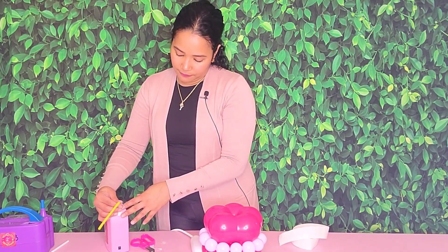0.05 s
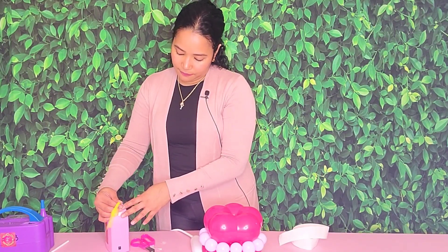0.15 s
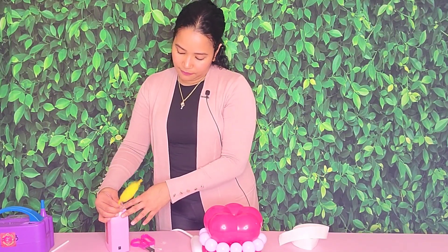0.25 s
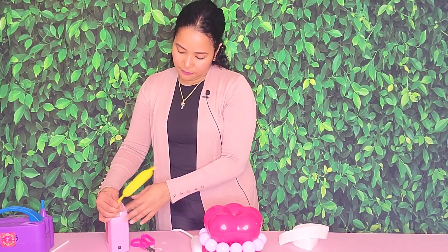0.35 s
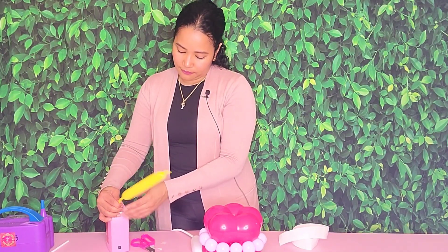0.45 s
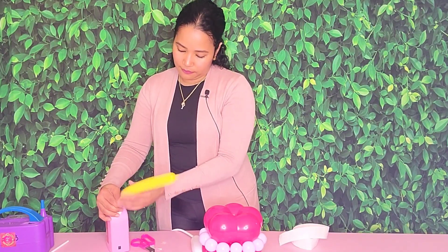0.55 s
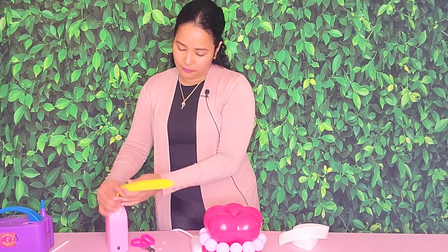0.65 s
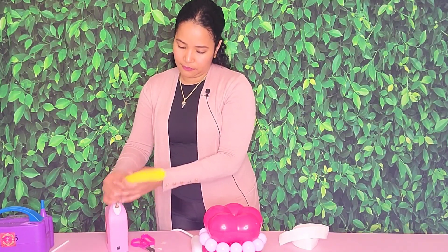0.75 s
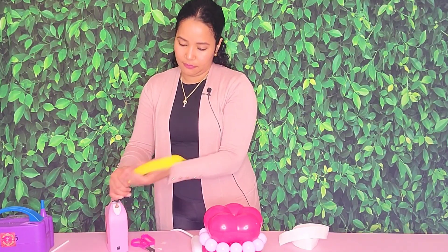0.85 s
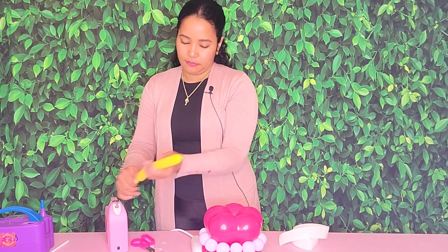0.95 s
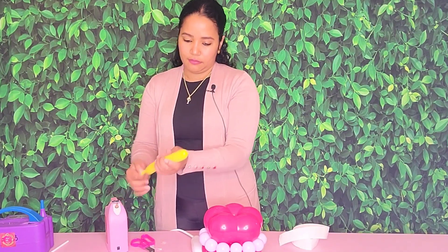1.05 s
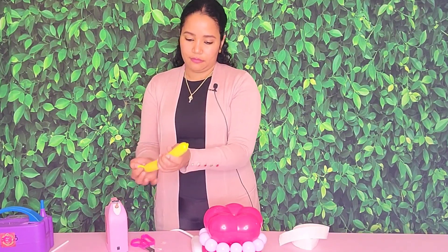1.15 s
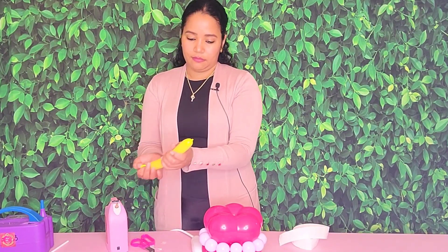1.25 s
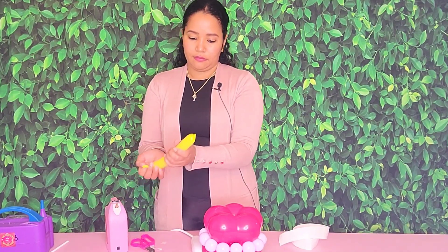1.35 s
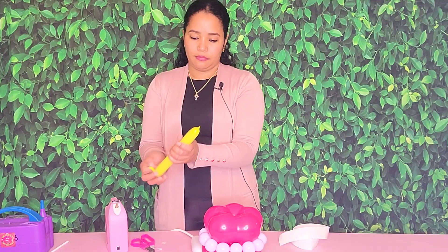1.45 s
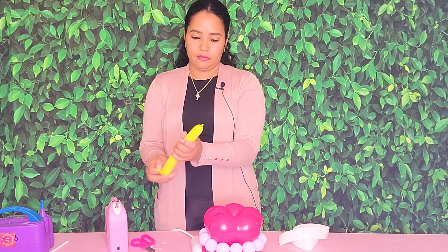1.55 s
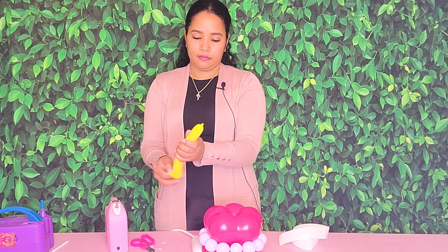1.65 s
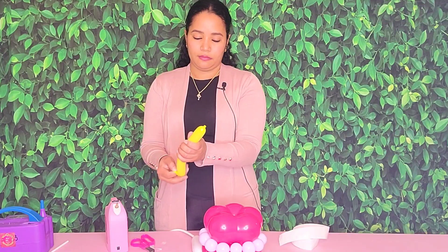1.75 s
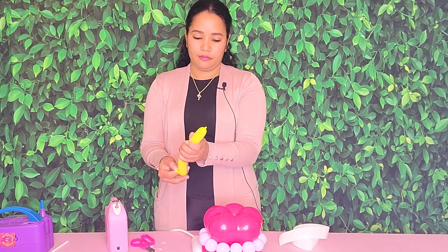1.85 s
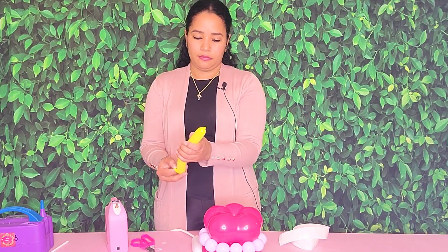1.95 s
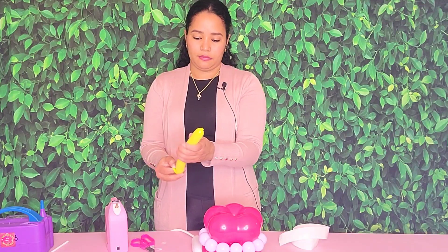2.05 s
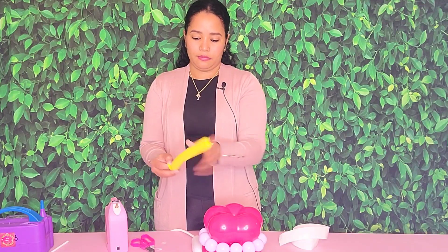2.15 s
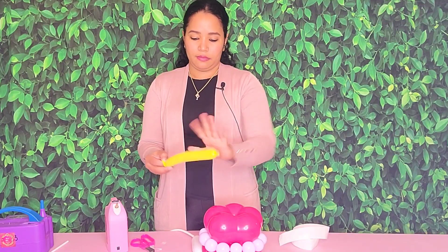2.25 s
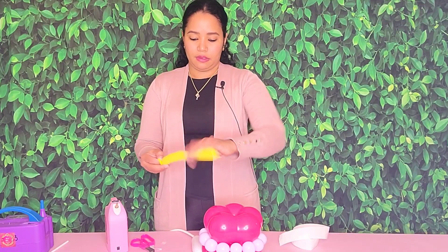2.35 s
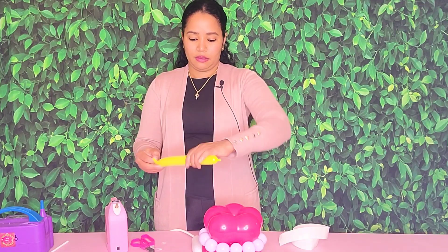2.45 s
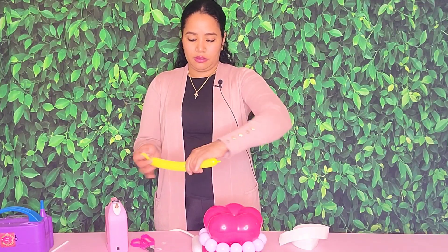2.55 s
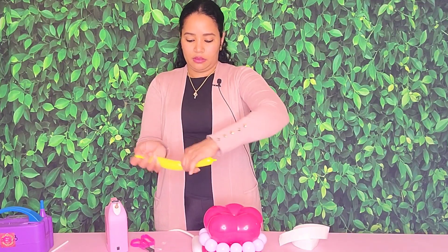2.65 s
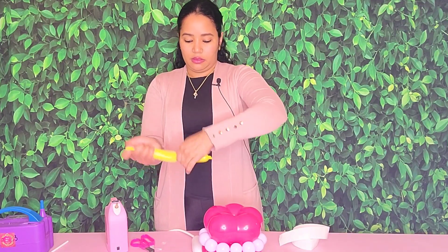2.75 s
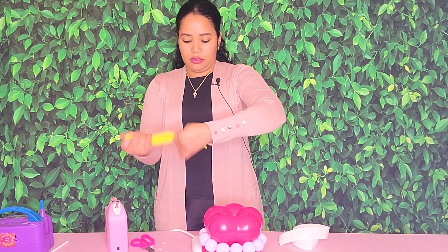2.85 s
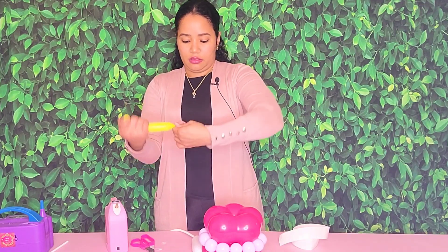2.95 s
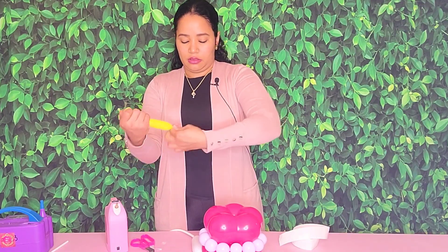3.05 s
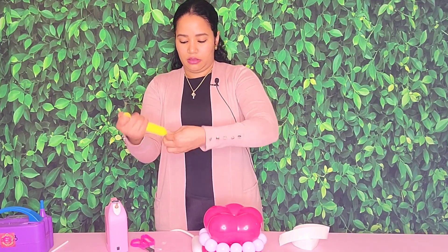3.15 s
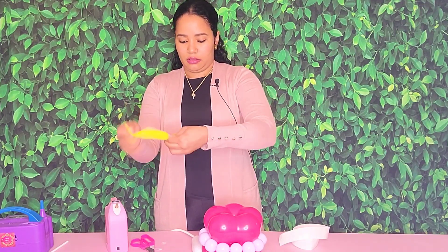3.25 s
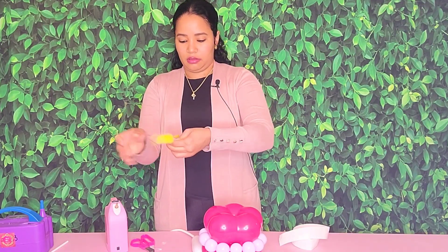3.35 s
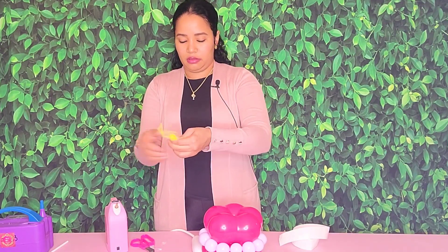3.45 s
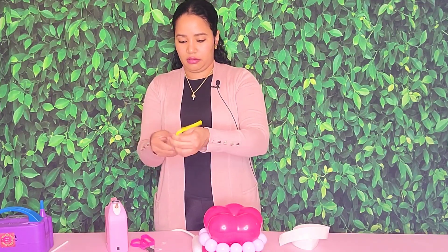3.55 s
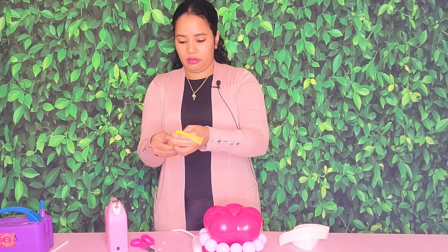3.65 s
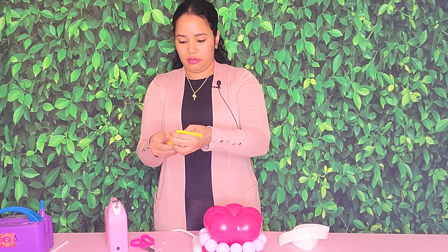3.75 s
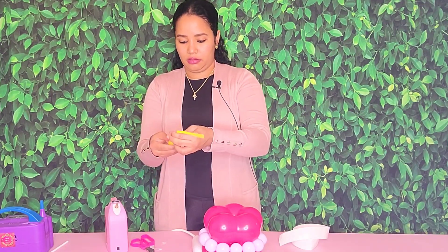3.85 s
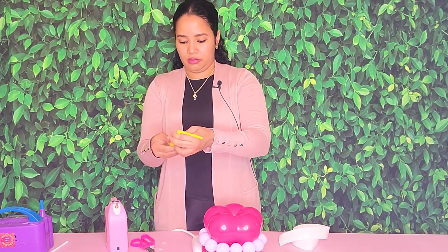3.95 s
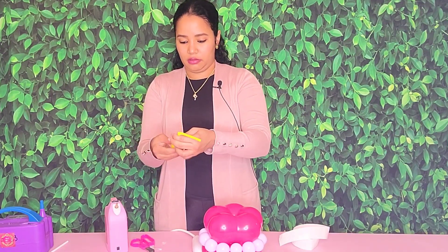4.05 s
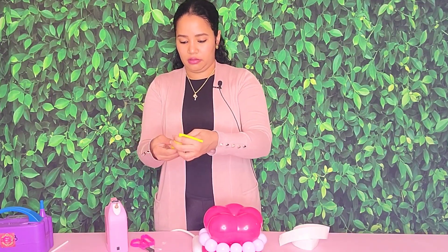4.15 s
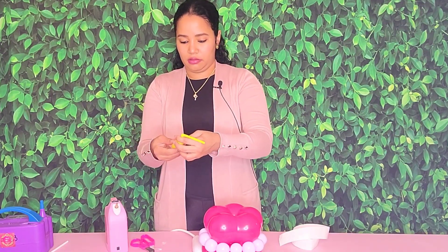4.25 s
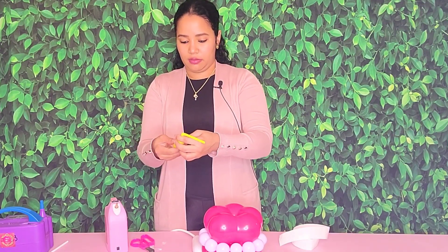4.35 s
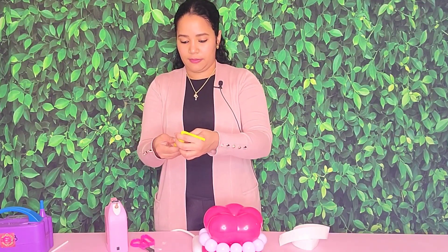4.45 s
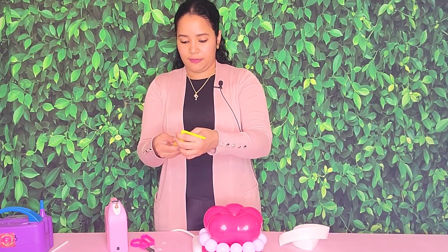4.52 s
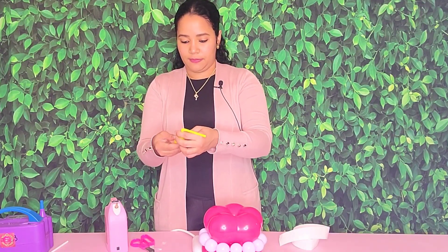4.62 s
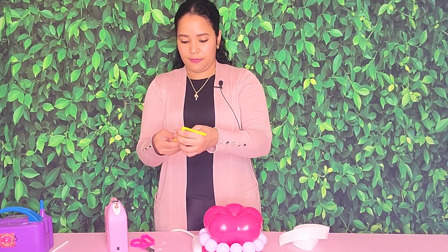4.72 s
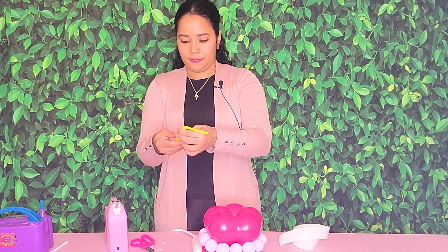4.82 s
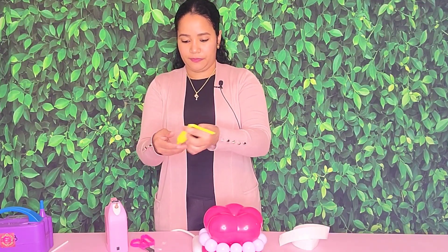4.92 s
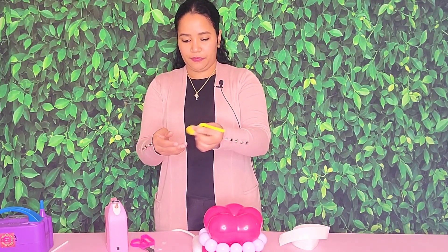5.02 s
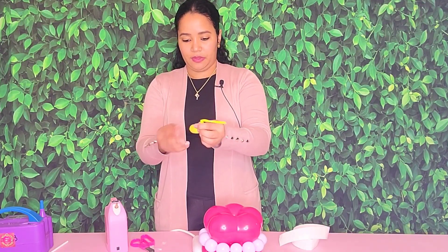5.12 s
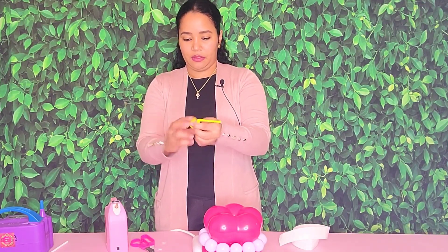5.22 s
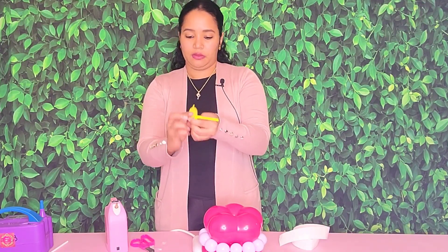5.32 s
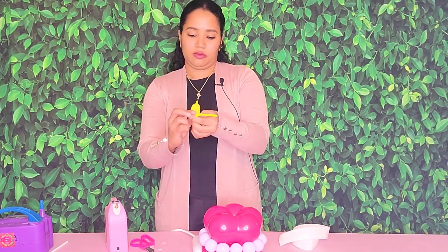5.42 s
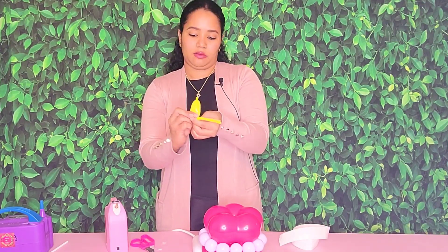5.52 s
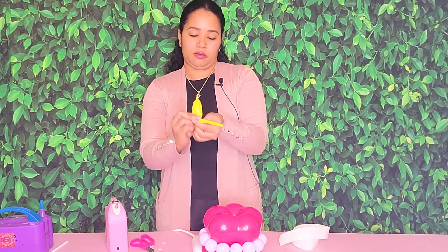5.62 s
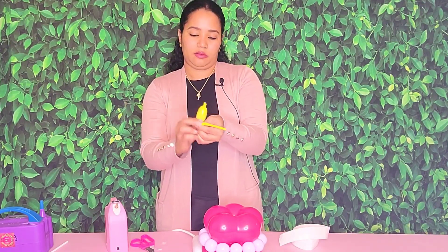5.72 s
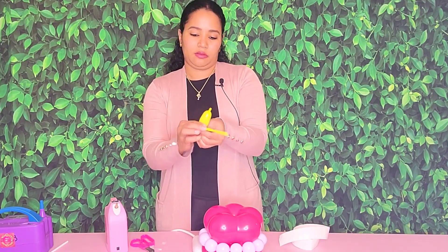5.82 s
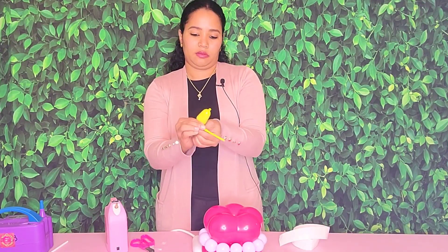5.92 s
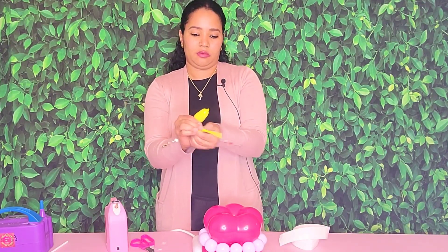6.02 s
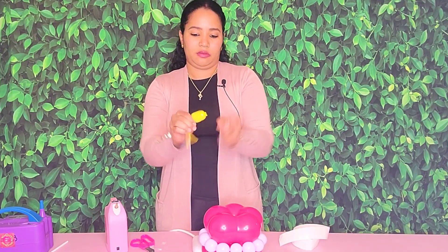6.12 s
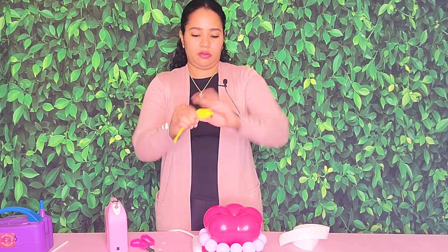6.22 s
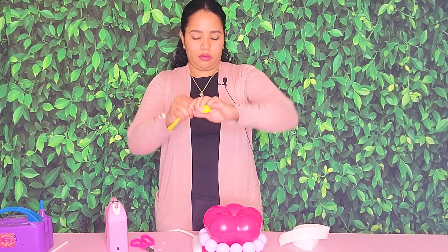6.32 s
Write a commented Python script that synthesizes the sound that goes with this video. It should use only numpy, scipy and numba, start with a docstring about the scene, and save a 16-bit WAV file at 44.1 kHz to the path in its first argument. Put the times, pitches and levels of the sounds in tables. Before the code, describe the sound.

In a small bare room with faint hum and hiss, a little electric pump clicks on and rattles with growing air hiss for half a second, then cuts off with a sharp puff. Hands rub the long balloon: swishing strokes, dense rubbery creaks and pops, two quick high squeaks just after three seconds, then sparser, drier ticks and small chirps. Close, clear microphone with a short room echo.

```python
"""A faint rub of latex over room air and mains hum; then a small electric piston pump fills a long balloon
for half a second: strokes thump its housing and the valve hisses louder as pressure builds.
Hands then stroke, squeeze and twist the balloon. Slips ring its air and wall as ticks and creaks, regular
slips make squeaks and chirps, skin hisses along it, a pinched leak whistles. Short decaying sines are the
pump's knocks and whistle and the bubble's thump and rings. The bare room adds a tail and a far wall's answer."""
import sys
import numpy as np
from scipy import signal
from scipy.fft import rfft, irfft, next_fast_len
from scipy.io import wavfile
from scipy.ndimage import map_coordinates
from numba import njit

SR = 44100
rng = np.random.default_rng(int(sys.argv[2]) if len(sys.argv) > 2 else 0)


def generate_wav(signal):
    """Clip the signal to [-1, 1] and save it as 16-bit WAV at the path in sys.argv[1]."""
    frames = np.transpose(np.atleast_2d(signal))
    scaled = np.clip(frames, -1, 1) * 32767
    pcm = np.round(scaled).astype(np.int16)
    wavfile.write(sys.argv[1], SR, pcm)


N = 281181
T = np.arange(N) / SR  # seconds

# Spectra set the colour of a layer; the layer's own gain sets how loud it is.
# Room air and preamp hiss: freq_hz, level_db (dB per Hz, relative)
ROOM_AIR = [(30, -38), (60, -10.5), (150, -13), (400, -30), (1000, 3.5), (2000, 4.5), (3500, -5.5),
            (6000, -7), (11000, -8), (16000, -24)]
# Mains hum: freq_hz, level_db (rms)
MAINS_HUM = [(120, -94), (240, -92)]
# The squeezed bubble's moving resonances: time_s, drum_hz, wall_hz
BUBBLE_MODES = [(.8, 1000, 3600), (1.3, 900, 3300), (1.7, 1250, 3800), (2.25, 750, 4200), (2.5, 1200, 3700),
                (2.68, 680, 3800), (2.95, 700, 4600), (3.09, 1000, 3300), (3.7, 1250, 3300),
                (4.1, 1080, 3400), (4.5, 1250, 3700), (6.38, 1150, 3600)]
# Finger grips, swelling and fading; a row with a negative time is practically silent:
# peak_s, rise_s (per 20 dB), fall_s (per 20 dB), creak_db, drum_db (re creak), bright_db (re creak)
FINGER_GRIPS = [(.007, -5.77, .05, -30.5, -22.5, -5), (.76, 1.3, 0.14, -39.5, -0.5, -23),
                (1, -0.74, .3, -43, -5, -18.5), (1.147, -0.2, 0.44, -43, -3.5, -18.5),
                (1.269, 0.01, -0.04, -21.5, -5.5, -17.5), (1.399, 0.2745, 0, -23.5, -4, -18.5),
                (1.59, 0.2, 0.09, -20, -7, -14), (1.69, 0.26, 1.8, -38.5, -16, -16.5),
                (1.92, -0.09, 0, -29, -7, -9.5), (2.011, 0.1227, 0.07, -24.5, -11.5, -16.5),
                (2.187, 0.73, -0.2, -26.5, -10, -18), (2.35, 0.07, .15, -23, -3.5, -18),
                (2.417, 0.12, 0.1, -26, -4, -17.5), (2.3, 0.1, .08, -26.5, -9, -18.5),
                (2.6, 0.14, 0.27, -24.5, -3.5, -19), (2.748, 0.1265, 0.35, -21, 0, -21),
                (2.867, 0.1748, 0.06, -19.5, -3.5, -18), (2.963, 0.6, 0.24, -20.5, -30, -19),
                (3.095, 0.05, 0.23, -17, -9.5, -20), (3.464, 0.2, 0.13, -30.5, -2.5, -22),
                (3.537, 0.09, -0.03, -19, -6, -12.5), (3.558, .012, .015, -19, -11, -12.5),
                (3.672, 0.07, 0.0629, -24, -3, -26.5), (3.75, -1, 0.5, -48, 2, -17),
                (3.933, -0.07, 0.14, -31.5, -4, -16), (4.103, 0.0619, 0.0767, -27, 5.5, -16.5),
                (4.37, 0.11, 0.07, -38.5, -9.5, -16), (4.558, 0.1, 0.17, -37.5, -6, -17.5),
                (4.8, 0.0048, 0.06, -29, -0.5, -21), (4.85, -0.55, 0.65, -47.5, -1, -14),
                (4.963, 0.05, 0.0635, -24, -2.5, -16.5), (5.32, 0.1216, 0.06, -32.5, -2, -4),
                (5.474, -1, -0.94, -30, -10.5, -11.5), (5.628, 0.06, 0.12, -31, -2, -13),
                (5.682, -2, -0.0123, -21.5, -17.5, -13), (5.855, .02, -0.63, -38.5, -11, -11),
                (6, 0.78, 0.15, -45, 3, -5.5), (6.306, .04, 6, -32.5, -6.5, -10),
                (6.362, -0.02, .06, -18.5, -14, -10)]
# Single slips, before each layer's trim: start_s, crack_db, drum_db (re crack), snap_db (re crack)
SINGLE_SLIPS = [(.1322, -13, -8.5, -14.5), (.608, -9, -18, 0), (.83, -25.5, -7.5, -20.5),
                (.8646, -32, -1.5, -10), (.993, -25, -8.5, -19), (1.0346, -30.5, -3.5, -6),
                (1.1193, -28.5, -1, -3), (1.2197, -22.5, -10, -8), (1.2819, -10, -17, -17.5),
                (1.4066, -5.5, -14, -19.5), (1.6516, -11, -14.5, -7.5), (1.7327, -11.5, -9.5, -13),
                (1.7811, -18, -10.5, -14), (1.9113, -7, -9.5, -25), (2.2473, -24, 7.5, -4),
                (2.3441, -2.5, -17.5, -17.5), (2.4022, -16, -20, -18), (2.6395, -9, -5.5, -6.5),
                (2.6807, -11.5, -29, -16), (2.8079, -3.5, -7, -15.5), (2.8458, -5, -17, -16.5),
                (2.874, -6.5, -26, -19), (2.931, -2, -28, -15), (3.0427, -13, -12, -11.5),
                (3.0811, -6.5, -29, -18), (3.1315, -4.5, -14, -14.5), (3.2078, -11.5, -12, 6),
                (3.3185, -10.5, -14.5, 11), (3.421, -9, -18, 3), (3.7754, -23, -23, -14),
                (3.7853, -30.5, 1, -17), (3.8044, -24, -17.5, -19), (3.8396, -35.5, -12, -13),
                (4.0071, -22, -3, -9), (4.1443, -17, -12, -22), (4.1754, -17, -12, -22.5),
                (4.2349, -27.5, -7, -19.5), (4.3859, -19, -17, -18.5), (4.399, -21, -25, -15.5),
                (4.421, -27, 5, -6.5), (4.5148, -29.5, -14.5, -11.5), (4.5466, -21.5, -13.5, -17),
                (4.5587, -30, 5.5, -11), (4.7026, -27, -17.5, -17.5), (4.807, -24, -10, -26),
                (4.8532, -29.5, -9, -25), (5.0476, -48.5, 12.5, -9), (5.4594, -39, -17, -0.5),
                (5.4695, -12.5, -15.5, -12.5), (5.5181, -25.5, -25, -12.5), (5.618, -26.5, -11, -10.5),
                (5.8491, -21.5, -19, -6), (6.0243, -20, -7, -9), (6.0536, -30.5, 0, -10),
                (6.163, -38, -14, -18), (6.2219, -25, -7, -11.5)]
# Runs of slips at a steady pace, before each layer's trim:
# start_s, length_s, gap_s, crack_db, change_db (over the run), drum_db (re crack)
SLIP_RUNS = [(1.6828, 0.0066, 0.0056, -11.5, -1, -12), (1.9227, 0.0043, 0.0046, -14.5, -2, -7.5),
             (2.0108, 0.0153, 0.014, -11, -1.5, -16.5), (2.1233, 0.082, .018, -12.5, -8, -11),
             (2.2872, .021, 0.00725, -16.5, 1, -17), (2.3568, 0.0174, 0.0067, -8.5, -1, -14),
             (2.5691, .024, .012, -11, -0.5, -25), (2.8365, 0.085, .0097, -8, 2.5, -14),
             (2.9543, 0.02, 0.0054, -4, -2, -24.5), (3.0671, 0.037, .0106, -10.5, -1.5, -19.5),
             (3.531, .012, 0.0037, -18, -0.5, -9.5), (3.5578, .004, .0035, -14.5, 1.5, -9),
             (3.733, 0.029, .014, -31, -1, -1.5), (3.9186, 0.03, 0.01014, -23, 5.5, -15),
             (4.0514, 0.0047, 0.0046, -22.5, -2, -6), (4.0744, 0.036, .0126, -21, 4, 0),
             (4.2942, 0.066, .011, -32.5, 6, -11), (4.4366, 0.058, 0.0226, -29, -4, -20),
             (4.5877, 0.0414, .0102, -21, -5.5, -15.5), (4.7605, 0.017, 0.0061, -32, 4, -7),
             (4.9187, .027, .0067, -32.5, 6, -10.5), (4.952, 0.027, 0.0054, -11.5, -16, -11.5),
             (5.536, .027, .0066, -35.5, 0, -17), (5.6234, 0.029, .0064, -15, -3, -10.5),
             (5.7612, .029, 0.013, -21.5, -6, -24), (5.9124, 0.11, 0.01457, -31.5, -2, -1),
             (6.304, 0.008, 0.00505, -19.5, 2, -14.5), (6.3453, 0.0303, 0.0047, -16.5, -1, -24.5)]
# The housing's answer to a stroke: multiple (of the stroke rate), level_db (relative)
HOUSING = [(1, -23), (2, -21), (3, -4), (4, -1), (5, -6), (6, -4), (7, -8), (8, -7), (9, -15), (10, -7),
           (11, -1), (12, -1), (13, -7), (14, -3), (15, -1), (16, -4), (17, -6), (18, 0), (19, -5),
           (20, -6), (21, -8), (22, -6), (23, -3), (24, -11), (25, -14), (26, -14), (27, -18), (28, -16),
           (29, -20)]
# Air through the valve: freq_hz, level_db (dB per Hz, relative)
VALVE_AIR = [(1290, -23), (2200, 10.5), (2430, 9), (2690, 5.5), (3870, 9), (5720, 4), (8240, 6),
             (9970, 2.5), (11200, 7), (16000, -14.5)]
# Air escaping at the nozzle: peak_s, level_db, t60_s
NOZZLE_BLASTS = [(0.121, -27, 0.042), (0.607, -20, 0.051), (0.627, -21.5, .1)]
# Short ringing tones, the pump's knocks and whistle, the bubble's thump and rings:
# start_s, level_db (peak), pitch_hz, t60_s (of the first fifth; the tone dies faster after that)
SHORT_TONES = [(.081, -24, 950, .12), (.1325, -3, 1150, .02), (.6, -22, 8200, .2), (1.31, -26, 3100, .9),
               (2.246, -25, 330, .06), (2.256, -36, 1750, .2), (2.443, -22, 1400, .28),
               (5.849, -33, 2550, .1)]
# A palm's long strokes along the latex: time_s, level_db (before its ripple)
PALM_STROKES = [(.76, -57), (1, -56.5), (1.12, -34.5), (1.22, -51), (1.4, -41.5), (1.46, -48),
                (1.53, -28.5), (1.67, -23), (1.79, -39.5), (1.97, -28.5), (2.15, -26), (2.42, -32.5),
                (2.52, -27.5), (2.59, -37.5), (3.09, -33.5), (3.43, -33), (3.52, -51), (3.87, -72),
                (4.01, -44.5), (4.74, -78)]
# Skin hiss: freq_hz, level_db (dB per Hz, relative)
SKIN_HISS = [(40, -55), (200, -23.5), (3530, -11), (6000, -14.5), (7520, -7), (8820, -3), (9860, -6.5),
             (10500, -2.5), (11600, 0), (12400, -2), (13500, -7), (15200, -8.5), (16000, -14)]
# Regular stick-slip, before the catch and the flutter:
# start_s, length_s, first_rate_hz, last_rate_hz (slips), level_db, roughness (0-1)
SQUEAK_NOTES = [(3.209, .058, 876, 835, -10.5, .12), (3.317, .048, 822, 788, -11, .17)]
# Squeak harmonics: multiple (of the slip rate), level_db (relative)
SQUEAK_HARMONICS = [(1, -21), (2, 0), (3, -15), (4, -16), (5, -18), (6, -7), (7, -10), (8, -5), (9, -10),
                    (10, -11), (11, -1), (12, -7), (13, -4), (14, -12), (15, -18), (16, -22), (17, -24),
                    (18, -25)]
# Duller creaks, before the catch and the flutter:
# start_s, length_s, first_rate_hz, last_rate_hz (slips), level_db, roughness (0-1)
CHIRP_NOTES = [(5.234, 0.012, 822, 822, -22, .15), (5.246, .028, 801.5, 731.1, -14.5, .25),
               (5.276, 0.054, 417, 382.5, -20, .9), (5.669, 0.023, 573, 588, -20.5, 0.99)]
# Chirp harmonics: multiple (of the slip rate), level_db (relative)
CHIRP_HARMONICS = [(1, -2.5), (2, -4), (3, -1.5), (4, 0), (5, -1.5), (6, -4), (7, -17), (8, -20)]
# A pinched air leak, before a 9 dB lift: time_s, pitch_hz, level_db (peak)
LEAK = [(5.08, 10321, -62), (5.116, 12500, -58), (5.2, 13800, -71)]
# The room's diffuse decay: freq_hz, t60_s
ROOM_DECAY = [(200, 0.21), (2000, 0.25), (6000, 0.061), (14000, 0.028)]

RUN_SNAP_DB, RUN_SCATTER_DB, RUN_JITTER = -18.5, 2.5, .08  # re crack; from slip to slip; share of the gap
TWISTED_S, BELLY_LONG, BELLY_SHORT = 3.5, 0.42, 0.0308  # once twisted off, the low mode's gain drops
BASS_LONG_HZ, BASS_SHORT_HZ = 250, 453  # and the bubble radiates less bass
ON_S, OFF_S = 0.07866, 0.59  # the pump's button goes down, comes up
RUN_HZ, START_LAG_HZ, SPIN_UP_S, RUN_DOWN_HZ_PER_S = 75.72, 21, .04, 130  # strokes per second
THROB_DB, THROB_RISE_S, THROB_T60 = -20, 0.023, .38  # 27 dB up in the rise
AIR_DB, AIR_GROWS_DB_PER_S, AIR_OPENS_S, AIR_T60 = -21.5, 11.5, .113, 0.48  # level as the button comes up
SETTLE_S, COAST_EVEN = 0.045, 0.404  # time scale of strokes turning even; evenness 0-1 while coasting
CATCH_HZ, CATCH_ROUGH, CATCH_S = 15, 0.22, .007  # a squeak starts higher and rougher, then settles
TOP_HZ = 15900  # band limit


def amp(db):
    """Decibels to linear gain."""
    return 10 ** (np.asarray(db) / 20)


def unit(x):
    """Scale to rms 1."""
    return x / np.sqrt(np.mean(x ** 2) + 1e-20)


def along(points, hz):
    """Interpolate (freq_hz, value) points on a log frequency axis."""
    f, v = np.transpose(points)
    return np.interp(np.log(hz + 1), np.log(f + 1), v)


def curves(rows):
    """One value per sample for each column, and a gate that is open while the table lasts."""
    s, *cols = np.transpose(rows)
    gate = np.clip(np.minimum(T - s[0], s[-1] - T) / 0.001864, 0, 1)
    return [np.interp(T, s, c) for c in cols] + [gate]


def wobble(rate):
    """A smooth random curve with rate knots a second."""
    knots = rng.standard_normal(int(N * rate / SR) + 4)
    return map_coordinates(knots, [T * rate])


def filtered(x, response):
    """Multiply the spectrum by a complex response of frequency."""
    m = next_fast_len(N + SR // 2)
    hz = np.fft.rfftfreq(m, 1 / SR)
    return irfft(rfft(x, m) * response(hz), m)[:N]


def noise(spectrum):
    """Coloured noise of rms 1."""
    return unit(filtered(rng.standard_normal(N), lambda hz: amp(along(spectrum, hz))))


@njit
def resonate(x, cosine, pole):
    """Two-pole band-pass whose centre moves."""
    y = np.zeros(len(x))
    for i in range(2, len(x)):
        y[i] = x[i] - x[i - 2] + 2 * pole * cosine[i] * y[i - 1] - pole * pole * y[i - 2]
    return y


def ring(x, hz, width_hz):
    """Moving resonance, scaled so that white noise keeps its rms."""
    pole = np.exp(-np.pi * width_hz / SR)
    cosine = np.cos(2 * np.pi * hz / SR + 0 * x)
    return resonate(x, cosine, pole) * np.sqrt((1 - pole ** 2) / 2)


def bursts(sizes, t60):
    """Every impulse becomes a puff of noise that dies in t60 seconds."""
    puff = amp(-60 * T[:SR // 20] / t60)
    return signal.fftconvolve(np.abs(sizes), puff)[:N] * rng.standard_normal(N)


def stack(turns, orders, flutter_db, lag=0):
    """Harmonics phased as a sudden push that rings out; high ones lag, each flutters alone. Nominal rms 1."""
    k, db = np.transpose(orders)
    envelope_db = np.interp(np.arange(129), np.r_[0, k, 2 * k[-1]], np.r_[db[0] - 20, db, -60])
    log = np.log(amp(envelope_db))
    phase = -signal.hilbert(np.r_[log, log[-2:0:-1]]).imag  # minimum phase
    lines = 0
    for n, level in orders:
        gain = amp(level + flutter_db * wobble(30.22))
        lines = lines + gain * np.cos(2 * np.pi * n * (turns - lag * n) + phase[int(n)])
    return lines / np.sqrt(np.sum(amp(2 * db)) / 2)


def room_air():
    """Steady coloured noise of room air and preamp."""
    return amp(-60.5) * noise(ROOM_AIR)


def mains_hum():
    """Steady sines at multiples of the mains frequency."""
    return sum(amp(db) * np.sqrt(2) * np.sin(2 * np.pi * hz * T) for hz, db in MAINS_HUM)


def swells(rows):
    """Gains that rise and fall at a steady dB rate, power-summed for each level column, each re the first."""
    power = np.zeros((len(rows[0]) - 3, N))
    for s, rise, fall, db, *rel_db in rows:
        span = slice(max(int((s - 3 * rise) * SR), 0), int((s + 3 * fall) * SR))
        t = T[span] - s
        drop_db = 20 * np.maximum(-t / rise, t / fall)
        power[:, span] += amp(2 * (db + np.r_[0, rel_db][:, None] - drop_db))
    return np.sqrt(power)


def slips():
    """Sudden releases of the latex: the single slips, then the runs laid out at their pace."""
    rows = list(SINGLE_SLIPS)
    for s, length, gap, db, change_db, drum_db in SLIP_RUNS:
        chance = rng.standard_normal((16, 2))  # a run has at most 16 slips
        for k in range(min(round(length / gap) + 1, 16)):
            at = gap * (k + RUN_JITTER * chance[k, 0] * (k > 0))
            crack_db = db + change_db * at / length + RUN_SCATTER_DB * chance[k, 1]
            rows.append((s + at, crack_db, drum_db, RUN_SNAP_DB))
    return np.transpose(rows)


def latex():
    """Slips, single and in swarms, ring the bubble's air (drum), its wall and a bright snap."""
    drum_hz, wall_hz, _ = curves(BUBBLE_MODES)
    s, db, drum_db, snap_db = slips()
    hits = lambda level: np.bincount((s * SR).astype(int), amp(level), N)[:N]
    grip, low, bright = swells(FINGER_GRIPS)
    long_bubble = T < TWISTED_S

    # tiny slips come in clumps, some larger than the rest
    chance = 700 / SR * amp(3 * wobble(60))
    swarm = (rng.random(N) < chance) * amp(2.4 * rng.standard_normal(N))
    grain = unit(unit(bursts(swarm, t60=0.01)) + 0.57 * rng.standard_normal(N))

    crack = grip * grain + amp(-1.0) * bursts(hits(db), t60=0.01346) + 0.2 * hits(db)
    wall = 0.84 * ring(crack, wall_hz * amp(1.37 * wobble(30)), width_hz=1180)
    wall += 0.36 * ring(crack, 1.65 * wall_hz, width_hz=4900)
    wall = filtered(wall, lambda hz: 1j * hz / (1200 + 1j * hz) / (1 + (hz / 7500) ** 8))

    push = low * grain + amp(np.where(long_bubble, 17, 22)) * hits(db + drum_db)
    drum = ring(push, drum_hz * amp(.8 * wobble(20)), width_hz=260)
    belly = ring(push, 0.57 * drum_hz, width_hz=350)  # the low mode
    drum += np.where(long_bubble, BELLY_LONG, BELLY_SHORT) * belly
    drum = filtered(drum, lambda hz: 1 / (1 + 1j * hz / 3000))  # a fingertip's push is soft

    snap = bursts(hits(db + snap_db - 3.5), t60=0.0032) + 3.36 * hits(db + snap_db) + bright * grain
    snap = ring(ring(snap, 10640, width_hz=6900), 10640, width_hz=6900)

    bubble = wall + drum + snap
    radiated = lambda corner_hz: filtered(bubble, lambda hz: (1j * hz / (corner_hz + 1j * hz)) ** 4)
    return np.where(long_bubble, radiated(BASS_LONG_HZ), radiated(BASS_SHORT_HZ))


def pump():
    """Each stroke thumps the housing, then the valve puffs; a weaker puff follows half a turn later."""
    on, off = np.maximum(T - ON_S, 0), np.maximum(T - OFF_S, 0)
    throb_db = THROB_DB - 27 * np.maximum(1 - on / THROB_RISE_S, 0) - 60 * off / THROB_T60
    air_db = AIR_DB + AIR_GROWS_DB_PER_S * np.minimum(T - OFF_S, 0) - 60 * off / AIR_T60
    air_db -= 21 * (T < AIR_OPENS_S)
    even = np.clip(np.where(off > 0, COAST_EVEN, np.tanh((on / SETTLE_S / 2) ** 2)), 0, .99)
    stroke_hz = RUN_HZ - START_LAG_HZ * np.exp(-on / SPIN_UP_S) - RUN_DOWN_HZ_PER_S * off
    turns = np.cumsum(stroke_hz) / SR
    turns -= turns[round(.3005 * SR)]  # a stroke falls here

    # uneven strokes are noise in the housing's colour, even ones are harmonics
    body = noise([(hz * 72, db) for hz, db in [(.3, -48)] + HOUSING + [(40, -58.5)]])
    throb = np.sqrt(1 - even ** 2) * body - even * stack(turns, HOUSING, flutter_db=2.9, lag=.0025)

    puff = lambda at: np.exp(5 * (np.cos(2 * np.pi * (turns - at)) - 1))
    swell = .14 + puff(.31) + .2 * puff(.8)
    blasts = 0
    for s, db, t60 in NOZZLE_BLASTS:
        blasts = blasts + amp(db - 60 * np.abs(T - s) / np.where(T < s, .03, t60))
    air = (amp(air_db) * (even * unit(swell) + 1 - even) + blasts) * noise(VALVE_AIR)
    return (on > 0) * (amp(throb_db) * throb + air)


def short_tones():
    """Each knock, whistle, thump or ring is a decaying sine that dies faster after a fifth of its ring."""
    out = np.zeros(N)
    for s, db, hz, t60 in SHORT_TONES:
        t = np.maximum(T - s, 0)
        damped = np.maximum(5 * t / t60 - 1, 0)
        out += amp(db - 60 * t / t60 - 150 * damped) * np.sin(2 * np.pi * hz * t)
    return out


def slide():
    """A stroking palm hisses, slightly grainy; the gap under it resonates at a wandering pitch."""
    db, gate = curves(PALM_STROKES)
    hiss = noise(SKIN_HISS)
    gap = unit(ring(hiss, 11500 * amp(0.55 * wobble(5)), width_hz=710))
    ripple_db = 1.2 * wobble(25.33) + wobble(300)
    return gate * amp(db + ripple_db) * unit(hiss + 0.14 * gap)


def squeaks(rows, orders, attack_s, release_s):
    """Slips so regular that they make a pitch; roughness is noise let through once a slip."""
    rate, gain, rough = np.zeros((3, N))
    colour = [(400, -55)] + [(820 * k, level) for k, level in orders]
    colour += [(820 * len(orders) + 4500, -18), (21000, -40)]
    for s, length, first, last, db, grain in rows:
        span = slice(int(s * SR), int((s + length) * SR))
        t = T[span] - s
        catch = np.exp(-t / CATCH_S)
        rate[span] = first + (last - first) * t / length + CATCH_HZ * catch
        fade_in = t / np.minimum(attack_s, length / 2)
        fade_out = (length - t) / release_s
        gain[span] = amp(db) * np.clip(np.minimum(fade_in, fade_out), 0, 1)
        rough[span] = np.clip(grain + CATCH_ROUGH * catch, 0, 1)
    turns = np.cumsum(rate * amp(0.216 * rough * wobble(200))) / SR
    grit = (1 + np.cos(2 * np.pi * turns)) * noise(colour)
    voice = stack(turns, orders, flutter_db=2.5) * (1 - rough) + rough * grit
    out = gain * amp(0.71 * wobble(70)) * voice
    return filtered(out, lambda hz: (1j * hz / (300 + 1j * hz)) ** 3)


def leak_whistle():
    """Air through a pinched leak: a gliding sine whose level trembles."""
    hz, db, gate = curves(LEAK)
    return gate * amp(db + 9.0 + wobble(60)) * np.sin(2 * np.pi * np.cumsum(hz) / SR)


def room(x):
    """A diffuse tail, and a far wall that answers after a twentieth of a second."""
    hz, t, z = signal.stft(rng.standard_normal(SR // 2), SR, nperseg=256)
    diffuse = amp(-60 * t / along(ROOM_DECAY, hz)[:, None])
    wall = 0.47 * np.exp(-((t - .048) / 0.0024) ** 2) / (1 + hz[:, None] / 14000)
    shape = (diffuse + wall) * (t > .004)
    tail = signal.istft(z * shape, SR, nperseg=256)[1]
    return signal.fftconvolve(x, tail / np.linalg.norm(tail))[:N]


def scene():
    """Mix the dry sources, the room's answer to all but the palm's hiss, hum and room air."""
    chirps = squeaks(CHIRP_NOTES, CHIRP_HARMONICS, attack_s=0.0083, release_s=0.0039)
    balloon = latex() + short_tones() + leak_whistle() + chirps  # the pump's short tones share this room level
    squeal = squeaks(SQUEAK_NOTES, SQUEAK_HARMONICS, attack_s=0.0023, release_s=.004)
    motor = pump()
    # the squeal is thrown outwards, so the walls answer it more
    wet = room(amp(-15) * balloon + amp(-9) * squeal + amp(-14) * motor)
    return (balloon + squeal + motor + slide() + wet + mains_hum() + room_air())[None]


def record(dry):
    """The preamp rounds off the highest peaks, the bass is cut, nothing passes above the band limit."""
    x = dry[0] / (1 + np.abs(dry[0]) ** 8) ** (1 / 8)
    return filtered(x, lambda hz: (1j * hz / (45 + 1j * hz)) ** 2 * (hz < TOP_HZ))[None]


dry = scene()
out = record(dry)
generate_wav(out)
```